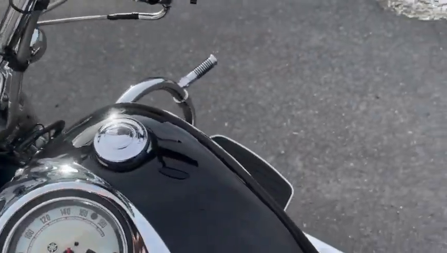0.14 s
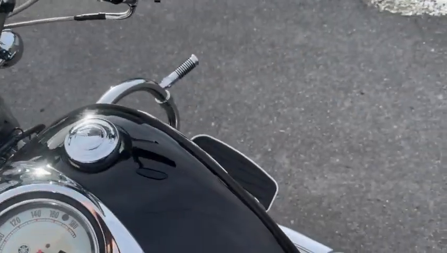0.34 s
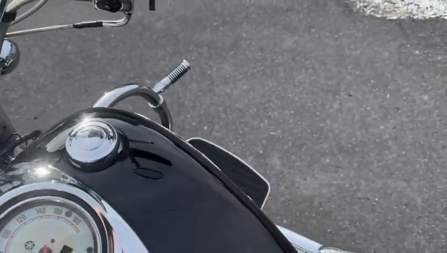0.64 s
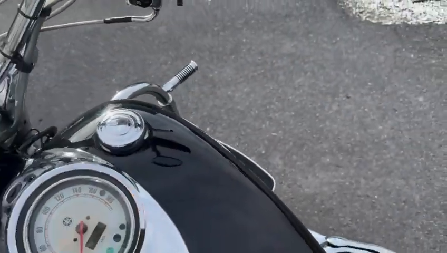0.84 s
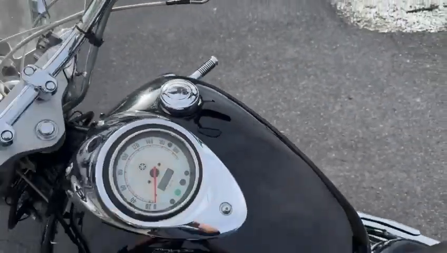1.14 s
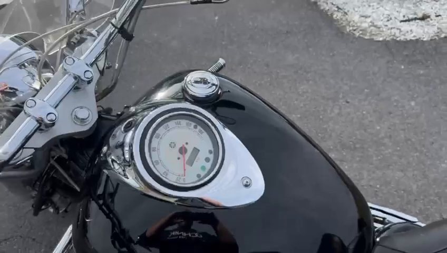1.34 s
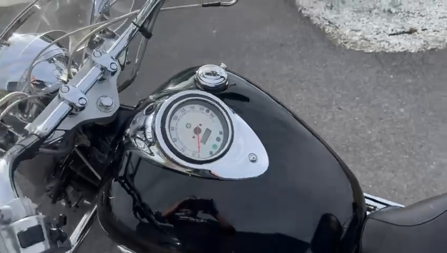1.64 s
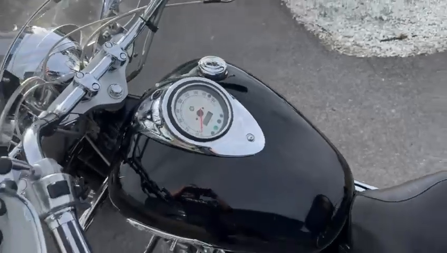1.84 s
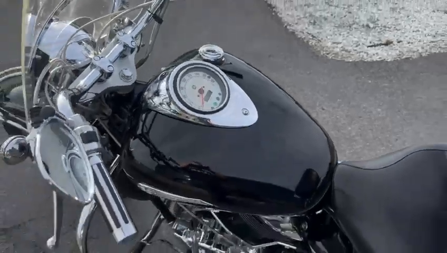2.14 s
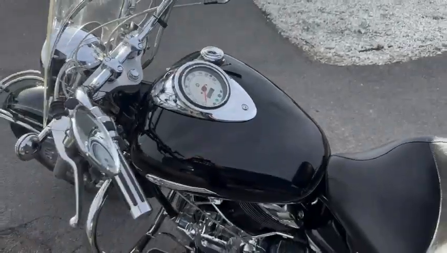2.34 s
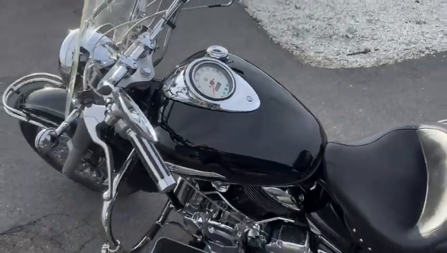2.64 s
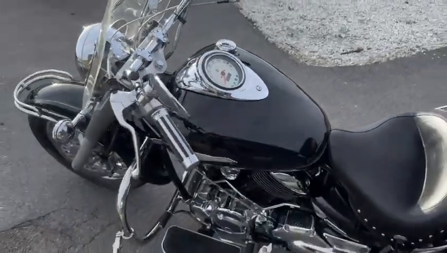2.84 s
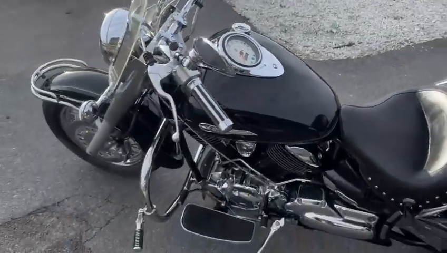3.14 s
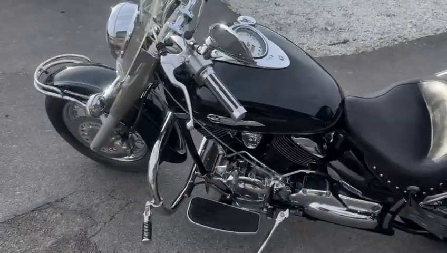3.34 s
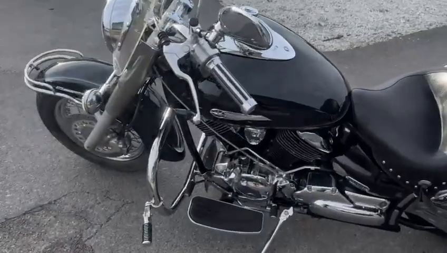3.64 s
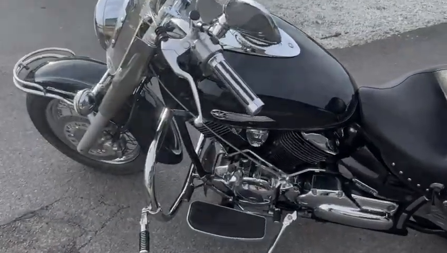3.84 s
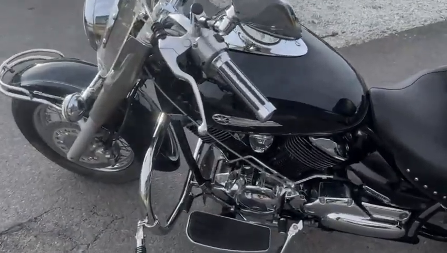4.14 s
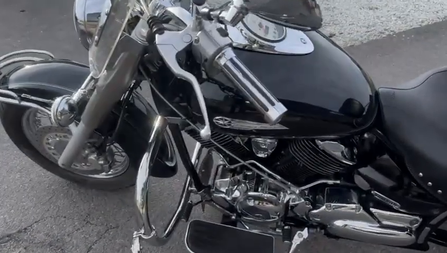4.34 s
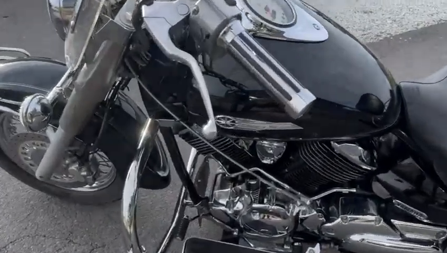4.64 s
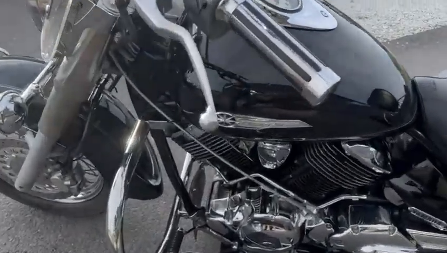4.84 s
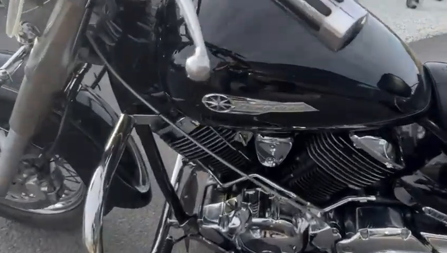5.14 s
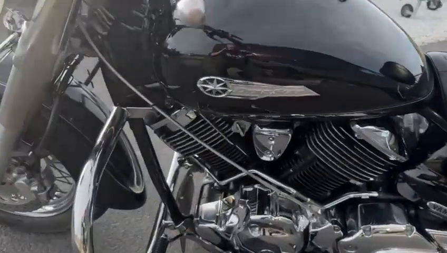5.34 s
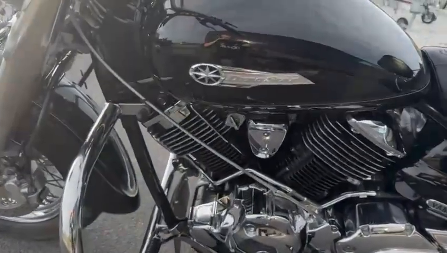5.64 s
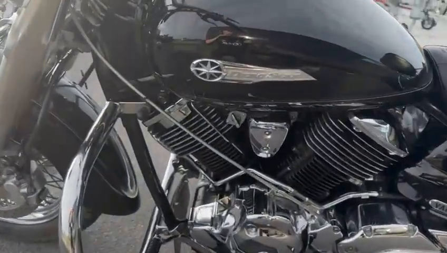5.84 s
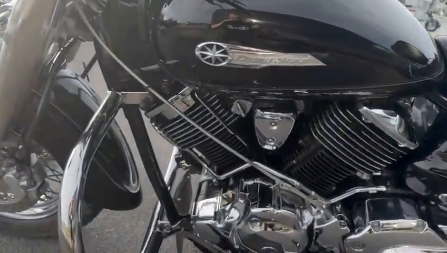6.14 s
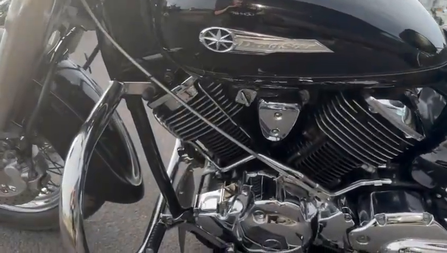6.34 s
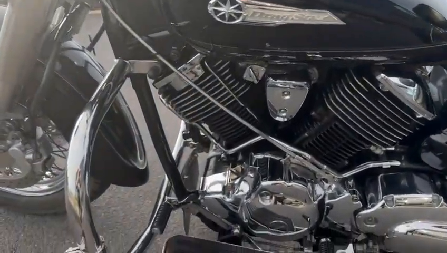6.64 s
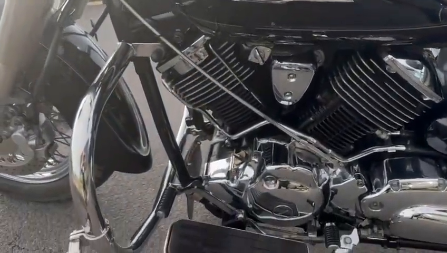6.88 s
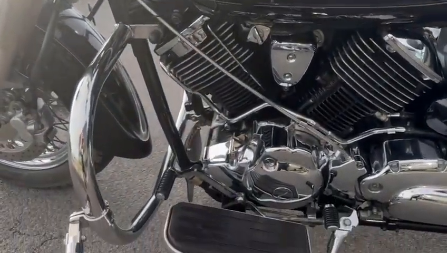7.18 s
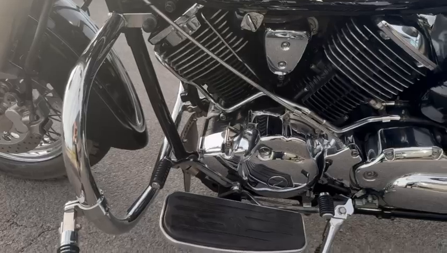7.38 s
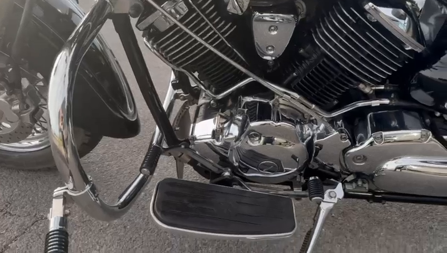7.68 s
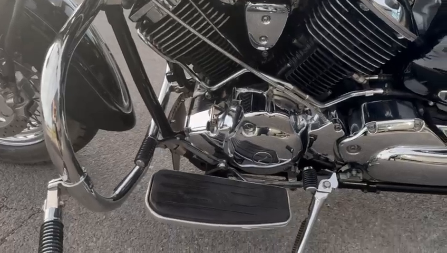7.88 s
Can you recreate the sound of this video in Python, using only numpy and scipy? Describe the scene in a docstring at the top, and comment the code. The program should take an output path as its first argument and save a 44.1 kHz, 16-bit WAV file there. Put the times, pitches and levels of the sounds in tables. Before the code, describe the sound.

Close outdoor stereo of a cruiser engine already running at a slow, slightly hunting idle. Deep lopsided beats and burbling gas lead, then the bike's body shields the pipe, leaving a diffuse boom under ringing metal, whirring gears and rustling chains. As the microphone nears the engine, the beat returns fuller, ticking brightens and hard metallic knocks appear. Two tiny sharp clicks, no speech, no revving.

```python
"""A V-twin cruiser idles in an open car park while the microphone moves from above the tank down to the cylinders.
At first uneven pairs of firings thump through the resonant muffler, with gas rumble, burble and dull pops.
Then the bike shields the pipe and the thump sinks into a soft boom, while struck cases ring and ping,
gears whine with the surging crank, noise bursts rustle as cam chains and tick as tappets.
Towards the end the microphone is closest, the thump returns and the drive gears knock; two moments click sharply."""
import sys
import numpy as np
from scipy import signal
from scipy.fft import rfft, irfft, next_fast_len
from scipy.io import wavfile
from scipy.ndimage import map_coordinates

SR = 44100
rng = np.random.default_rng(int(sys.argv[2]) if len(sys.argv) > 2 else 0)


def materialize(psi):
    """Save the field psi as 16-bit PCM at rate SR to the path in sys.argv[1].

    A 1-D psi becomes a single channel; in a 2-D psi each row is a channel.
    """
    bounded = np.clip(np.atleast_2d(psi).T, -1, 1)
    quanta = np.round(bounded * 32767).astype(np.int16)
    wavfile.write(sys.argv[1], SR, quanta)


N = 353241


def amp(db):
    """Decibels to gain."""
    return 10 ** (np.asarray(db) / 20)


def unit(x):
    """x scaled to an rms of 1."""
    return x / np.sqrt(np.mean(x ** 2) + 1e-20)


def curve(points):
    """Straight lines through (seconds, value) points, one value per sample."""
    return np.interp(np.arange(N) / SR, *np.transpose(points))


def along(points, hz):
    """(Hz, value) points read on a logarithmic frequency axis."""
    point_hz, value = np.transpose(points)
    return np.interp(np.log(hz + 1), np.log(point_hz + 1), value)


def filtered(x, response):
    """x times a complex response of frequency, padded with silence."""
    size = 2 * next_fast_len(N // 2 + SR // 4)
    spectrum = rfft(x, size) * response(np.fft.rfftfreq(size, 1 / SR))
    return irfft(spectrum, size)[..., :N]


def coloured(x, spectrum):
    """x through a minimum-phase filter of this spectrum: causal, so it rings after each blow."""
    def response(hz):
        """Fold the cepstrum onto positive time to find the phase."""
        cepstrum = irfft(np.log(amp(along(spectrum, hz))))
        half = len(cepstrum) // 2
        cepstrum[1:half] *= 2
        cepstrum[half + 1:] = 0
        return np.exp(rfft(cepstrum))
    return filtered(x, response)


def resonance(hz, centre, width):
    """The bandpass response of one damped resonance, 1 at its centre."""
    return 1j * hz * width / (centre ** 2 - hz ** 2 + 1j * hz * width)


def ringing(x, modes):
    """x through parallel resonances of alternating sign."""
    def response(hz):
        """Sum of the modes."""
        return sum((-1) ** k * amp(db) * resonance(hz, centre, width)
                   for k, (centre, width, db) in enumerate(modes))
    return filtered(x, response)


# How alike left and right are. Each row: frequency in Hz, likeness (correlation, 0-1).
STEREO_LIKENESS = [(60, 0.82), (150, 0.79), (400, 0.77), (800, 0.74), (1400, 0.55), (2800, 0.28),
                   (5500, 0.41), (8000, 0.35), (11000, 0.5)]


def stereo(mid, side):
    """Mix two unrelated signals into left and right: alike in the bass, less so in the treble."""
    def shares(hz):
        """Gains of the common and the opposed signal."""
        angle = np.arccos(np.clip(along(STEREO_LIKENESS, hz), -1, 1)) / 2
        return np.array([np.cos(angle), np.sin(angle)])
    mid, side = filtered(np.array([mid, side]), shares)
    return np.array([mid + side, mid - side])


def noise():
    """Two unrelated white noises."""
    return rng.standard_normal((2, N))


def wobble(rate):
    """A smooth random curve with rate knots a second."""
    knots = rng.standard_normal(int(N * rate / SR) + 4)
    return map_coordinates(knots, [np.arange(N) * rate / SR], order=2)


# The idle hunts a little. Each row: time in seconds, crank speed in rpm.
IDLE_RPM = [(0.0, 1053.6), (0.83, 998.4), (1.08, 1057.8), (1.6, 1004.8), (2.0, 1033.1), (2.31, 997.5),
            (2.69, 1074.1), (2.85, 1030.8), (3.8, 1025.6), (3.97, 1045.7), (4.75, 1018.3), (4.91, 1074.6),
            (5.29, 994.9), (5.86, 1016.9), (6.06, 1082.2), (7.14, 1066.7), (8.0, 1026.4)]
START_TURN = .13  # cam angle at time zero, in turns


def cam_turns():
    """Turns of the camshaft at each sample: one for every two of the crank."""
    return START_TURN + np.cumsum(curve(IDLE_RPM)) / (2 * 60 * SR)


def cam_pulses(blows, scatter_db, jitter_s):
    """One impulse per blow and cam turn, uneven in size and time, none far above the rest."""
    turns = cam_turns()
    angle, db = np.transpose(blows)
    due = np.arange(int(turns[-1]) + 1)[:, None] + angle
    shift, size = rng.standard_normal((2,) + due.shape)
    at = np.searchsorted(turns, due) + np.round(jitter_s * shift * SR).astype(int)
    heard = (due > turns[0]) & (due < turns[-1]) & (at >= 0) & (at < N)
    strength = amp(db + scatter_db * np.minimum(size, 1))
    return np.bincount(at[heard], strength[heard], N)


def bursts(pulses, t60):
    """An envelope of rms 1 that jumps at each pulse and falls 60 dB in t60 seconds."""
    decay = np.exp(-np.log(1000) / (t60 * SR))
    return unit(signal.lfilter([1], [1, -decay], pulses))


def clatter(modes, blows, rattle_db, steady):
    """Cam-timed blows ring one part; a rattle of noise follows each over a steady share."""
    blow_pulses = np.array([cam_pulses(blows, scatter_db=6.0, jitter_s=.0003) for _ in range(2)])
    rattle = unit(noise() * (steady + bursts(blow_pulses[0], t60=0.1)))
    ring = ringing(unit(blow_pulses) + amp(rattle_db) * rattle, modes)
    return unit(stereo(*ring))


# The microphone draws back from the tank, then comes down to the cylinders.
# Each row: time in seconds, nearness in dB.
NEARNESS = [(0, -3.5), (1.5, -6.5), (2.8, -6), (4.6, -4), (5.9, 0.1), (8, 1)]
# Parts that follow the nearness: level at 0 dB nearness in dB, dB gained per dB of nearness.
CRANK_REACH, CHAIN_REACH, TICK_REACH = (-35.5, 0.45), (-40, 0.89), (-45.5, 1.25)


def reach(law):
    """The gain of a part that grows louder as the microphone nears it."""
    base_db, slope = law
    return amp(base_db + slope * curve(NEARNESS))


# Side cover, gears, primary pinion and cylinder heads beam their sound, so level depends on direction;
# the heads beam upwards and to the side. Each row: time in seconds, relative level in dB.
COVER_BEAM = [(0.0, -34.5), (0.5, -34), (1.65, -41), (1.85, -34.5), (2.8, -34), (3.15, -42), (4.25, -43.5),
              (4.65, -36.5), (5.3, -38.5), (8.0, -32.5)]
GEAR_BEAM = [(0.0, -37.5), (1.75, -46), (2.1, -38), (2.85, -39), (3.15, -44), (5.8, -35.5), (6.05, -35.5),
             (8.0, -39.5)]
PINION_BEAM = [(0, -37.5), (1.65, -40), (1.85, -32.5), (2.8, -31.5), (3.15, -37), (4.25, -43), (4.65, -35),
               (5.3, -47), (8, -44)]
HEAD_BEAM = [(0, -39.5), (.9, -42), (2.0, -46), (2.8, -47), (3.3, -44), (5.3, -42.5), (6.5, -44),
             (8, -42.5)]


def part_gains():
    """How strongly each ringing part reaches the microphone."""
    return dict(crankcase=reach(CRANK_REACH), chain=reach(CHAIN_REACH),
                cover=amp(curve(COVER_BEAM)), gears=amp(curve(GEAR_BEAM)),
                pinion=amp(curve(PINION_BEAM)), head=amp(curve(HEAD_BEAM)))


# Firings that burn poorly. Each row: time in seconds, dB against a sound firing.
WEAK_FIRINGS = [(.0, -5), (.572, -2), (.976, -6), (1.275, -31), (4.703, -5), (5.002, -17), (5.475, -24)]
WEAK_S = .02  # half-length of the dip around a weak firing


def combustion():
    """The strength of the burn: full, except around the weak firings."""
    t = np.arange(N) / SR
    return amp(sum(db * (np.abs(t - s) < WEAK_S) for s, db in WEAK_FIRINGS))


# Rear and front cylinder. Each row: cam angle in turns, relative level in dB.
FIRINGS = [(.019, -5), (.41, -2)]
# The firings come a little late at first. Each row: time in seconds, delay in seconds.
FIRING_DELAY = [(0, 0.0065), (.9, 0.0042), (2.5, 0.00049)]


def firings_in_time():
    """One impulse for each firing, as strong as its burn, held back by the firing delay."""
    on_time = cam_pulses(FIRINGS, scatter_db=1.0, jitter_s=0.00024) * combustion()
    delay = np.round(curve(FIRING_DELAY) * SR).astype(int)
    return on_time[np.clip(np.arange(N) - delay, 0, N - 1)]


# The muffler's chambers, one after the other. Each row: frequency in Hz, width in Hz.
MUFFLER_CHAMBERS = [(48.5, 28), (87, 33.7), (168, 129)]
LAG_HZ, LAG_WIDTH_HZ = 74.5, 63  # the pipe holds this band back, so each thump sinks in pitch


def muffler(hz):
    """Chambers in series, then an allpass that delays the bass without changing its level."""
    chambers = np.prod([resonance(hz, centre, width) for centre, width in MUFFLER_CHAMBERS], axis=0)
    return chambers * (1 - 2 * resonance(hz, LAG_HZ, LAG_WIDTH_HZ))


# The exhaust fades while the bike stands between pipe and microphone.
# Each row: time in seconds, relative level in dB of the thump.
THUMP_LEVEL = [(0.0, -19.5), (0.25, -16.5), (0.5, -24), (0.76, -17), (.87, -20.5), (.97, -31), (1.15, -26),
               (2.7, -29), (3.3, -31.5), (4.05, -24), (4.25, -33), (4.6, -36), (4.8, -27.5), (5.25, -31),
               (5.4, -20.5), (6.0, -18), (7, -18), (8.0, -17.5)]
# Each row: time in seconds, relative level in dB of the gas rumble.
RUMBLE_LEVEL = [(0.0, -25), (0.35, -23.5), (0.6, -29), (0.75, -27.5), (1.3, -24), (2.2, -31), (2.75, -28.5),
                (3.3, -35.5), (4.1, -28.5), (5.2, -30), (5.6, -25.5), (6.3, -26.5), (6.65, -24),
                (6.9, -26.5), (7.2, -25), (8.0, -26.5)]
# Spectra of the diffuse boom and the gas rumble. Each row: frequency in Hz, relative level in dB.
BOOM_SPECTRUM = [(20, -39.5), (35, -3.5), (45, -7.5), (64, 8), (95, -1), (140, -12), (250, -25.5),
                 (600, -65)]
GAS_SPECTRUM = [(20, -11.5), (35, -18), (50, 3), (80, 4), (150, 4.5), (240, 1), (320, -5), (395, -7.5),
                (480, -6), (620, -11), (1000, -24), (2000, -62)]
# The exhaust shell's resonances. Each row: frequency in Hz, width in Hz, relative level in dB.
SHELL_MODES = [(387, 44, 0.5), (438.5, 35, 1), (493, 35, -10)]
# Blows on the shell. Each row: cam angle in turns, relative level in dB.
SHELL_BLOWS = [(.05, -1), (0.222, -4), (.48, -3), (.65, 2), (0.828, -3)]
# Each row: time in seconds, level in dB of the shell's hum.
HUM_LEVEL = [(0, -37.5), (.74, -33.5), (.81, -22.5), (.88, -29.5), (.95, -33), (2.5, -39), (2.9, -44),
             (3.55, -38), (4.2, -39), (5.1, -35.5), (6.5, -35.5), (8, -36.5)]


def exhaust(gas_db=1.32, boom_db=-0.5, steady_flow=2.2, loom=0.41, masking=0.64):
    """Each firing rings the muffler and drives a puff into turbulent gas; the shell hums along."""
    thump = amp(curve(THUMP_LEVEL))
    firings = firings_in_time()
    beat = unit(filtered(firings, muffler))
    flow = steady_flow + bursts(firings, t60=0.28)
    boom = unit(stereo(*coloured(noise() * flow, BOOM_SPECTRUM)))
    rumble = unit(stereo(*coloured(noise() * flow, GAS_SPECTRUM)))
    hum = clatter(SHELL_MODES, SHELL_BLOWS, rattle_db=-7.0, steady=1.0)
    # where the bike shields the pipe, the distinct beat sinks into the diffuse boom
    exposed = (thump / thump.max()) ** loom
    boom_share = amp(boom_db) * (1 - masking * exposed ** 2)
    pipe = thump * (exposed * beat + boom_share * boom)
    return pipe + amp(gas_db + curve(RUMBLE_LEVEL)) * rumble + amp(curve(HUM_LEVEL)) * hum


# Resonances of the exhaust's throat. Each row: frequency in Hz, width in Hz, relative level in dB.
THROAT_MODES = [(226.6, 51.6, 0.5), (299, 76, 0.5), (452, 113, -4)]
# Each row: time in seconds, level in dB of the burble.
BURBLE_LEVEL = [(0, -31.5), (.8, -29), (1.3, -29), (1.95, -31), (2.5, -38), (3.15, -36.5), (4.3, -40),
                (5.2, -36.5), (6, -43), (8, -39)]


def burble(puffs_per_s=170, scatter_db=4):
    """Small puffs of gas at random moments ring the throat of the exhaust."""
    chance, size = rng.random((2, N)), noise()
    puffs = (chance < puffs_per_s / SR) * amp(scatter_db * np.minimum(size, 1))
    return amp(curve(BURBLE_LEVEL)) * unit(stereo(*ringing(puffs, THROAT_MODES)))


# Dull pops in the muffler. Each row: start in seconds, relative peak in dB, brightness (lowpass corner) in Hz.
MUFFLER_POPS = [(.328, -8.5, 220), (.336, -8.5, 250), (0.814, -16, 700), (0.865, -25, 600),
                (0.883, -12.5, 400), (1.171, -12.5, 3000), (1.361, -16, 1400), (1.556, -16, 400),
                (1.899, -16, 650), (2.266, -16, 600), (2.308, -14.5, 500), (2.325, -22, 700),
                (2.462, -30, 600), (2.733, -12.5, 3000), (3.039, -15, 450), (6.611, -20, 400),
                (6.644, -13, 200), (7.08, -12, 503), (7.09, -8.5, 300), (7.275, -12, 450),
                (7.405, -11, 450)]


def pops(level_db=1):
    """A sudden push of gas rings the muffler's upper resonances; each pop has its own brightness, apart from
    its level."""
    modes = [(142, 79, -1.5), (237, 72, 4.5), (424, 290, -1.5), (700, 580, -15.5)]  # Hz, width Hz, dB
    ring = ringing(signal.unit_impulse(N), modes)[:SR // 10]
    out = np.zeros(N)
    for start_s, db, hz in MUFFLER_POPS:
        pole = np.exp(-2 * np.pi * hz / SR)
        pop = signal.lfilter([1], np.poly([pole, pole]), ring)
        pop *= amp(db + level_db) / np.abs(pop).max()
        out[round(start_s * SR):][:len(pop)] += pop
    return out


# Ringing parts of the engine. Each row: frequency in Hz, width in Hz, relative level in dB.
CRANKCASE_MODES = [(767, 23, -0.5), (815, 12, 0.5), (864, 48, -5)]
COVER_MODES = [(1125, 27, -3), (1251, 49, -4.5), (1273, 26, 4), (1402, 88, -9.5)]
GEAR_MODES = [(1388, 31, 5.5), (1613, 49, 4), (1880, 85, -1), (1850, 60, -11)]
HEAD_MODES = [(2290, 75, 1), (2404, 127, 3), (2486, 87, -2), (2626, 32, 3.5)]
# Blows on each of these parts. Each row: cam angle in turns, relative level in dB.
CRANK_BLOWS = [(.15, 5.5), (.33, -3), (.69, -6), (.87, 3)]
COVER_BLOWS = [(.07, -4), (.21, 7), (.29, 0), (.42, -2), (.595, 3.5), (.81, 4), (.96, 1)]
GEAR_BLOWS = [(.13, 2.5), (0.289, -1), (.38, -1), (.63, 1), (0.881, 3), (.97, -1)]
HEAD_BLOWS = [(.1, -1), (0.218, 5), (.38, 4.5), (0.598, -10), (.68, 9.5), (.96, 1.5)]
# Spectrum of the gear whirr. Each row: frequency in Hz, relative level in dB.
WHIRR_SPECTRUM = [(350, -20), (600, 4), (880, 4), (1020, 2), (1150, 4), (1400, 4), (1750, 1.5),
                  (2150, -4.5), (2700, -11), (3500, -33)]
# Each row: time in seconds, relative level in dB of the gear whirr.
WHIRR_LEVEL = [(0, -49), (.8, -38.5), (1.2, -36), (2.1, -37), (3.15, -37), (5.8, -34.5), (6.05, -32.5),
               (8, -35)]


def cases(crank_db=-4.5, cover_db=-5.5, gear_db=-5, head_db=-3.5, whirr_db=-1):
    """Crankcase, side cover, gears and heads each ring at their own pitch over the whirr of meshing teeth."""
    part = part_gains()
    crankcase = clatter(CRANKCASE_MODES, CRANK_BLOWS, rattle_db=-2.0, steady=0.66)
    cover = clatter(COVER_MODES, COVER_BLOWS, rattle_db=-6.5, steady=0.4)
    gears = clatter(GEAR_MODES, GEAR_BLOWS, rattle_db=5, steady=0.2)
    head = clatter(HEAD_MODES, HEAD_BLOWS, rattle_db=1.5, steady=0.45)
    load = 2.0 + bursts(cam_pulses(GEAR_BLOWS, scatter_db=7.5, jitter_s=0.001), t60=0.053)
    whirr = unit(stereo(*coloured(noise() * load, WHIRR_SPECTRUM)))
    return (amp(crank_db) * part["crankcase"] * crankcase
            + amp(cover_db) * part["cover"] * cover
            + amp(gear_db) * part["gears"] * gears
            + amp(head_db) * part["head"] * head
            + amp(whirr_db + curve(WHIRR_LEVEL)) * whirr)


# Loose parts that ping once a cycle. Each row: part that radiates it, cam angle in turns,
# nominal pitch in Hz, relative level in dB, t60 in seconds.
PINGS = [("crankcase", .16, 812, 0, 0.079), ("crankcase", .72, 824, -2, .05),
         ("crankcase", .87, 818, 0.91, 0.064), ("cover", .39, 1268, -1.1, 0.04),
         ("cover", .58, 1262, 0, .06), ("gears", .64, 1440, 1, 0.026), ("gears", 0.94, 1400, 0, 0.032),
         ("gears", 0.28, 1850, -4, 0.05), ("gears", .75, 2100, -6, 0.046), ("head", .08, 2420, 1, .04),
         ("head", .19, 2500, 0, 0.044), ("head", 0.49, 2400, 1, 0.045), ("head", .61, 2380, 4.3, 0.046),
         ("head", .96, 2440, 2, .035)]
# How far the pings of each part stray, as a share of the pitch.
PING_DETUNE = dict(crankcase=.011, cover=0.017, gears=.04, head=0.027)


def pings(level_db=7.5, glide_per_s=0.97, attack_s=0.0028, scatter_db=3.5, phase_spread=.55):
    """Short metallic rings, each at its own pitch and sliding as the contact tightens or slackens."""
    turns, parts, t = cam_turns(), part_gains(), np.arange(SR // 16) / SR
    out = np.zeros((2, N + len(t)))
    for part, angle, hz, db, t60 in PINGS:
        due = np.arange(int(turns[-1]) + 1) + angle
        starts = np.searchsorted(turns, due[(due > turns[0]) & (due < turns[-1])])
        shape = (1 - np.exp(-t / attack_s)) * np.exp(-np.log(1000) * t / t60)
        for at, (stray, slide, size, side) in zip(starts, rng.standard_normal((len(starts), 4))):
            pitch = 1 + PING_DETUNE[part] * stray + glide_per_s * slide * t / 2
            ear_phase = phase_spread * side * np.array([[1], [-1]])  # radians, opposite at each ear
            ring = shape * np.sin(2 * np.pi * hz * t * pitch + ear_phase)
            out[:, at:at + len(t)] += parts[part][at] * amp(db + scatter_db * min(size, 1)) * ring
    return amp(level_db) * out[:, :N]


# The drive gears take up their backlash with a hard knock. Each row: start in seconds, relative peak in dB.
GEAR_KNOCKS = [(6.150, -23), (6.271, -24), (6.495, -22), (6.598, -21), (6.831, -25), (7.500, -19),
               (7.613, -22.5), (7.844, -24)]
# What a knock rings. Each row: nominal frequency in Hz, relative level in dB, t60 in seconds.
KNOCK_MODES = [(1340, -9, 0.029), (1584, 4, 0.042), (1655, -19, 0.036)]


def knocks(level_db=-1, attack_s=0.0038, spread=0.0066):
    """Compact gear knocks: a few decaying sines, each knock at a slightly different pitch."""
    out, t = np.zeros(N), np.arange(SR // 10) / SR
    for start_s, db in GEAR_KNOCKS:
        pitch = 1 + spread * rng.standard_normal()
        ring = sum(amp(mode_db - 60 * t / t60) * np.sin(2 * np.pi * hz * pitch * t)
                   for hz, mode_db, t60 in KNOCK_MODES)
        ring *= (1 - np.exp(-t / attack_s)) ** 2
        ring *= amp(db + level_db) / np.abs(ring).max()
        out[round(start_s * SR):][:len(t)] += ring
    return out


# The crank surges and slows within each cycle. Each row: cam angle in turns, relative speed.
CRANK_SURGE = [(0, .985), (.12, .975), (.28, 1.035), (.4, 1.03), (.55, .995), (.68, 1.005), (.85, .99)]
# Gear and chain meshes. Each row: part that radiates it, teeth per cam turn, relative level in dB,
# the two cam angles of heaviest load in turns.
TOOTH_MESHES = [("crankcase", 46.5, -9, 0.057, 0.66), ("crankcase", 93, -2.2, 0.14, 0.856),
                ("pinion", 148, -5, 0.44, 0.26), ("cover", 143, -4.5, 0.65, 0.99),
                ("gears", 200, -6.5, 0.87, 0.9), ("gears", 165, -5, 0.17, 0.64),
                ("gears", 220, -8, 0.15, 0.4), ("head", 283, -3.5, 0.091, 0.6),
                ("head", 287, -9.5, 0.25, 0.36), ("chain", 566, -14.5, 0.21, 0.56)]


def gear_whine(focus=4, idle_load=0.68, slip=0.29, flicker_db=3.0):
    """Meshing teeth sing at multiples of shaft speed, swelling with load and warbling as the crank surges."""
    turn = cam_turns()
    speed = np.interp(turn, *np.transpose(CRANK_SURGE), period=1)
    shaft = np.cumsum(np.gradient(turn) * speed / speed.mean())
    parts = part_gains()
    out = np.zeros((2, N))
    for part, teeth, db, *peaks in TOOTH_MESHES:
        load = idle_load + sum(np.exp(focus * (np.cos(2 * np.pi * (turn - at)) - 1)) for at in peaks)
        swell = amp(db) * parts[part] * unit(load * amp(flicker_db * wobble(25)))
        # backlash lets the teeth slip back and forth, differently along two paths through the cases
        for path in range(2):
            backlash = slip * wobble(70) + np.pi * wobble(2.5)  # radians
            out[path] += swell * unit(np.sin(2 * np.pi * teeth * shaft + backlash))
    return stereo(*out)


# Slaps of the cam chains on their guides. Each row: cam angle in turns, relative level in dB.
CHAIN_SLAPS = [(.05, 0.5), (.15, 3), (.21, 5.5), (.315, 4), (.41, 1), (.49, 3), (.565, 3), (.62, -1.5),
               (.695, 2), (.79, -2), (.855, 3.5), (.965, 8.5)]
# Blows of the closing valves. Each row: cam angle in turns, relative level in dB.
VALVE_BLOWS = [(-.034, 7.5), (-.005, -1), (.295, -3), (.38, 0), (.585, -7), (.625, -4), (.81, 3)]
# Spectra of the chain rustle and the tappet ticks. Each row: frequency in Hz, relative level in dB.
CHAIN_SPECTRUM = [(800, -11.5), (2000, 3.5), (2700, 3.5), (3100, -1.5), (3450, -0.5), (4200, 0), (4800, -2),
                  (5400, -1.5), (6100, -6.5), (7000, -4.5), (8000, -2.5), (8900, -6.5), (9500, -60),
                  (10600, -7.5), (11600, -20)]
TICK_SPECTRUM = [(1000, -25), (3000, -11), (4800, -21), (5500, -1), (5900, 8), (6050, 0), (6230, 5.5),
                 (6500, 1), (7100, -1), (7950, 7), (8900, -0.5), (9500, -56), (10600, -4), (11600, -14.5)]
# The thin valve covers. Each row: frequency in Hz, width in Hz, relative level in dB.
VALVE_COVER_MODES = [(3047, 52, -2.5), (3250, 28, -9), (4230, 86, -13), (4500, 50, -6), (4752, 49, 1.5),
                     (5060, 63, -1), (5890, 40, -11.5), (6220, 49, -3.5), (7820, 82, -10.5)]


def valve_train(chain_db=0.5, ring_db=-5.5, flutter=1.4):
    """The cam chains rustle, the tappets tick as the valves close, and the valve covers sing faintly."""
    slaps = cam_pulses(CHAIN_SLAPS, scatter_db=9, jitter_s=0.00076)
    links = 2.5 + flutter * bursts(slaps, t60=0.067)
    chain = unit(stereo(*coloured(noise() * links, CHAIN_SPECTRUM)))
    closing = cam_pulses(VALVE_BLOWS, scatter_db=1, jitter_s=0.00075)
    softened = bursts(closing, t60=0.011)  # the cam ramp softens each tap
    taps = bursts(softened, t60=0.057)
    ticks = unit(stereo(*coloured(noise() * taps, TICK_SPECTRUM)))
    ring = clatter(VALVE_COVER_MODES, CHAIN_SLAPS, rattle_db=8, steady=0.87)
    return reach(CHAIN_REACH) * (amp(chain_db) * chain + amp(ring_db) * ring) + reach(TICK_REACH) * ticks


# Small sharp metal clicks, the second with its bounces.
# Each row: start in seconds, relative level in dB, pitch in Hz, t60 in seconds.
METAL_CLICKS = [(1.6955, -20, 8900, 0.004), (5.5718, -15.5, 3360, 0.0073), (5.5727, -19, 5600, .004),
                (5.576, -26, 5270, .011), (5.5792, -33, 7900, .007), (5.5865, -37, 7800, 0.0064)]


def clicks(left_db=1.0, crack=0.77):
    """Brief bright clicks close to the microphone: a very short ring with a crack of noise."""
    out, t = np.zeros((2, N)), np.arange(SR // 10) / SR
    for start_s, db, hz, t60 in METAL_CLICKS:
        band = signal.butter(1, [hz / 2, min(hz * np.sqrt(2), SR / 2 - 1)], "band", fs=SR)
        hiss = unit(signal.lfilter(*band, rng.standard_normal((2, len(t)))))
        click = (np.sin(2 * np.pi * hz * t) + crack * hiss) * np.exp(-np.log(1000) * t / t60)
        out[:, round(start_s * SR):][:, :len(t)] += amp(db) * click
    return out * amp(left_db * np.array([[1], [-1]]) / 2)


# Balance of the bike. Each row: frequency in Hz, left minus right in dB.
LEFT_LEAN = [(60, 0), (97, 1), (160, 1.5), (260, 0.5), (410, -0.5), (670, 2), (1090, -2), (1760, 1),
             (2850, -2), (4630, 3), (7500, 2.0), (12200, -1)]
# The cases' ring reaches one side first. Each row: frequency in Hz, radians by which the left leads.
LEFT_LEAD = [(700, -0.11), (950, 0.21), (1640, -1.68), (2330, -0.23)]


def scene():
    """The whole motorcycle, each band leaning a little to one side in level and phase, plus the clicks."""
    bike = exhaust() + burble() + pops() + cases() + pings() + knocks() + gear_whine() + valve_train()
    sides = np.array([[1], [-1]]) / 2

    def lean(hz):
        """Half the difference to each ear."""
        return amp(sides * along(LEFT_LEAN, hz)) * np.exp(1j * sides * along(LEFT_LEAD, hz))
    return filtered(bike, lean) + clicks()


TOP_HZ = 11600  # the recorder's band limit


def record(dry):
    """The recorder keeps nothing above its band limit."""
    return filtered(dry, lambda hz: hz < TOP_HZ)


dry = scene()
out = record(dry)
materialize(out)
```